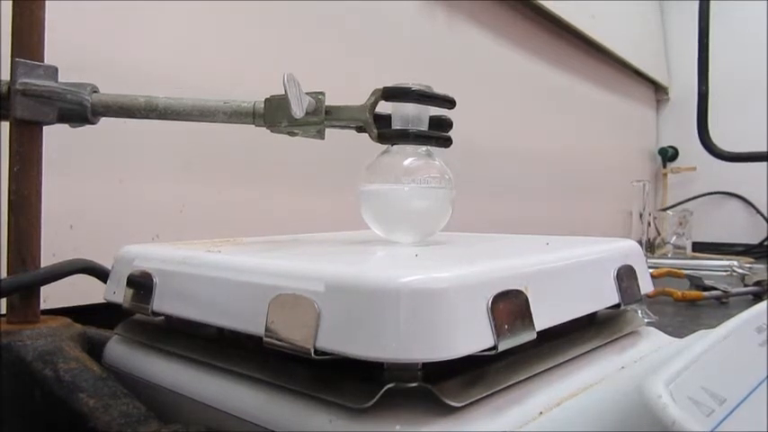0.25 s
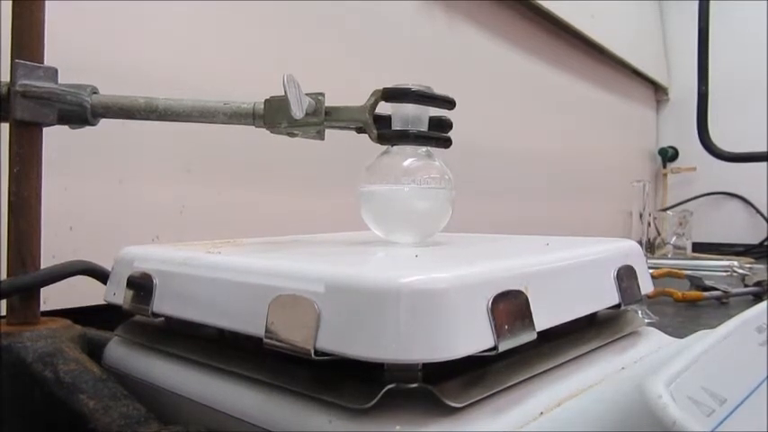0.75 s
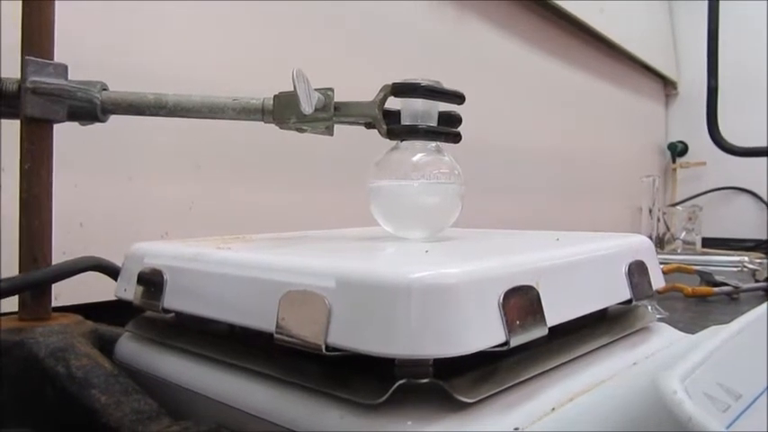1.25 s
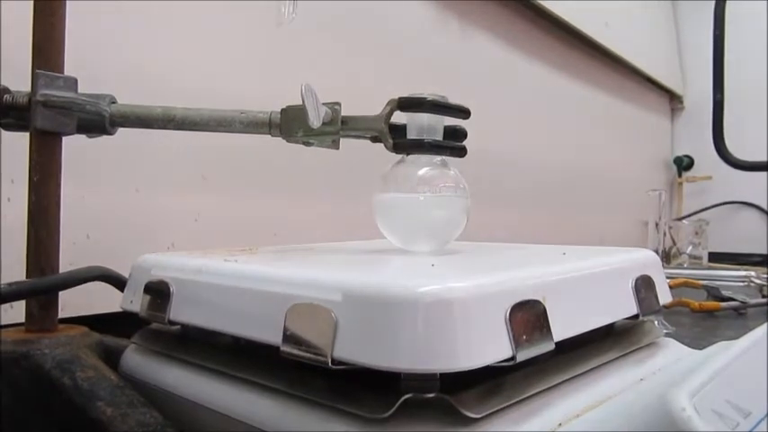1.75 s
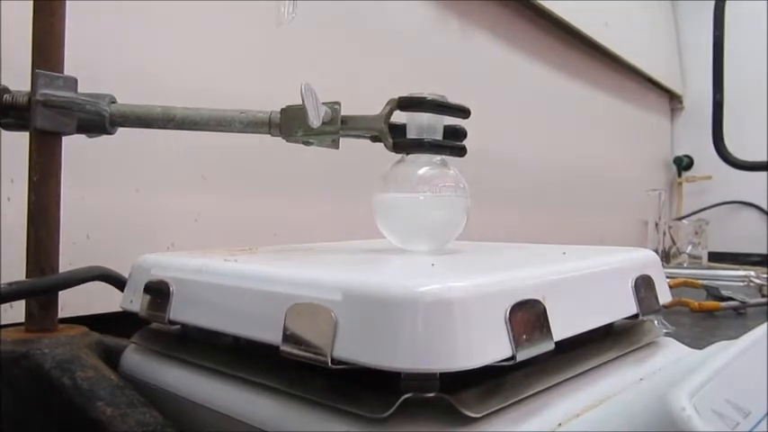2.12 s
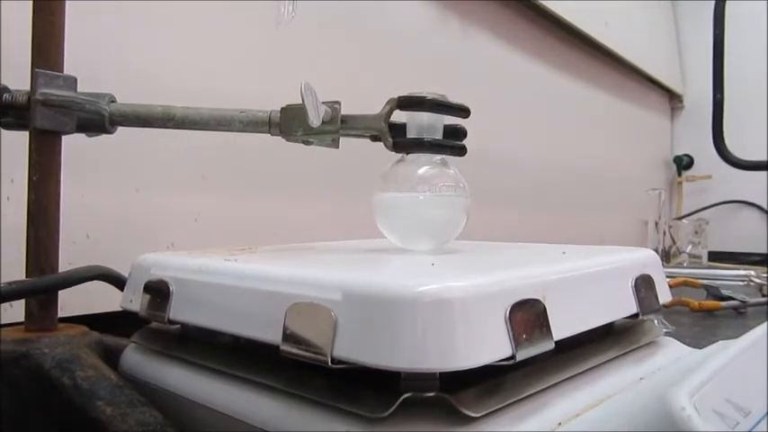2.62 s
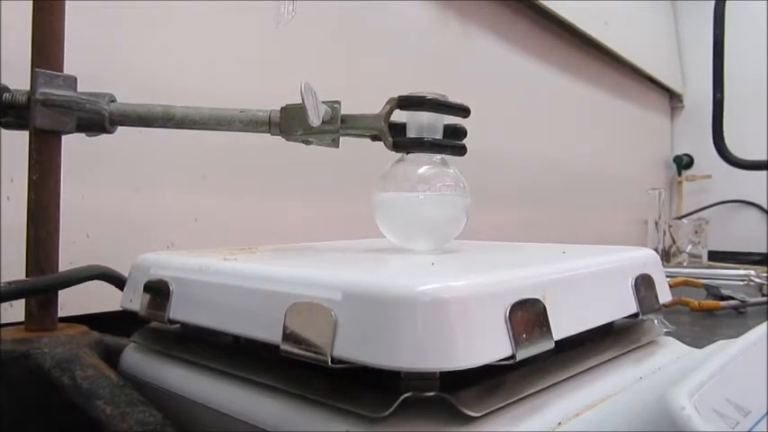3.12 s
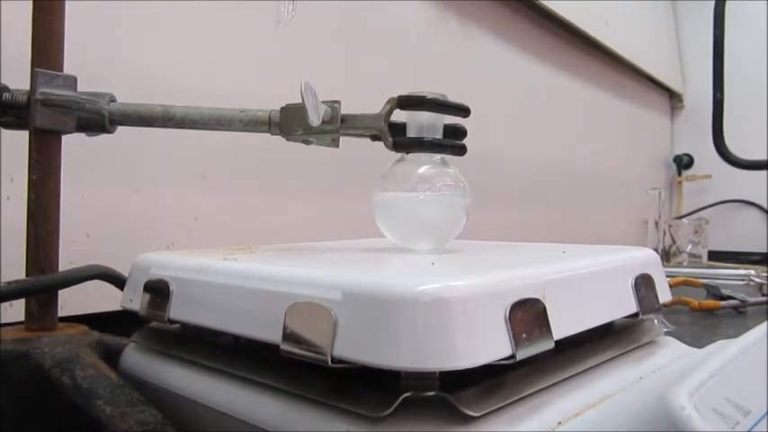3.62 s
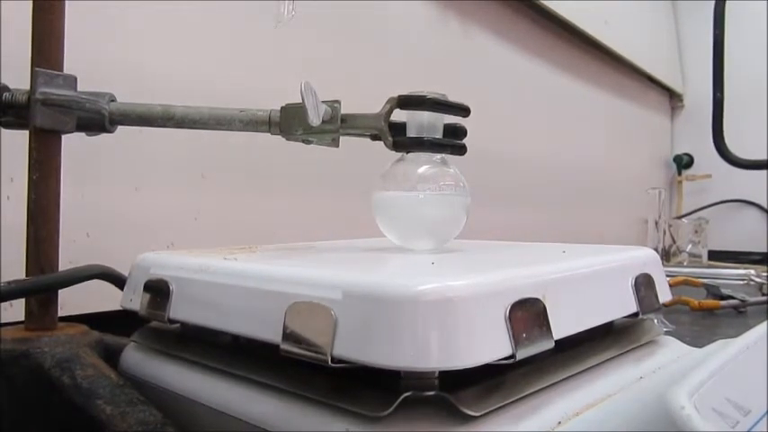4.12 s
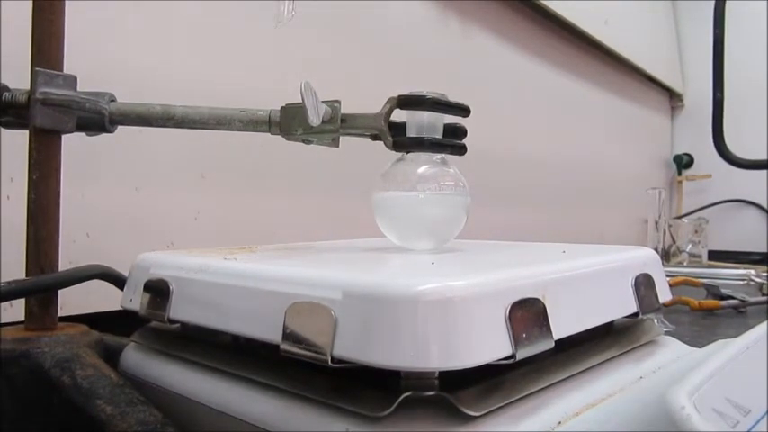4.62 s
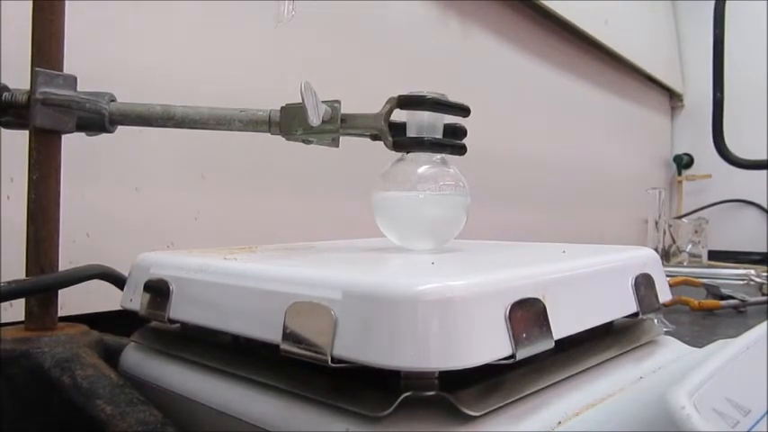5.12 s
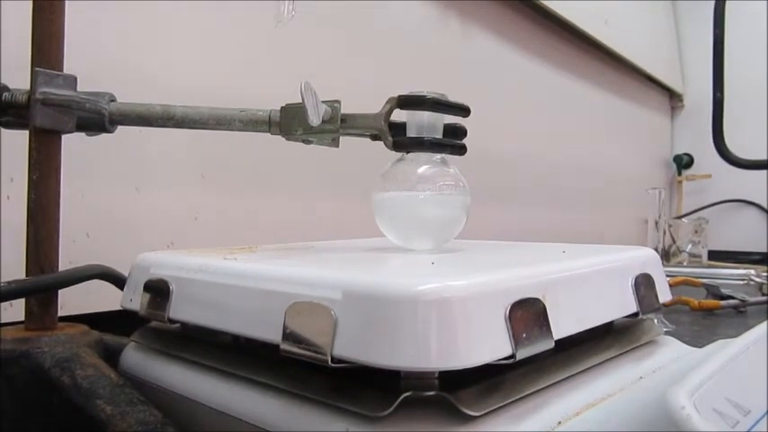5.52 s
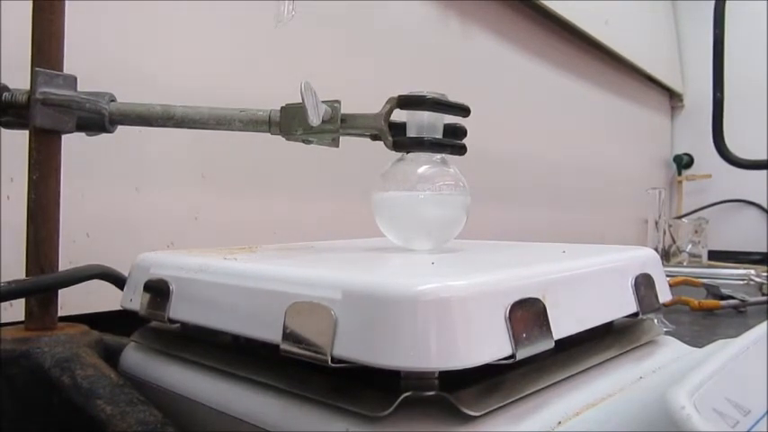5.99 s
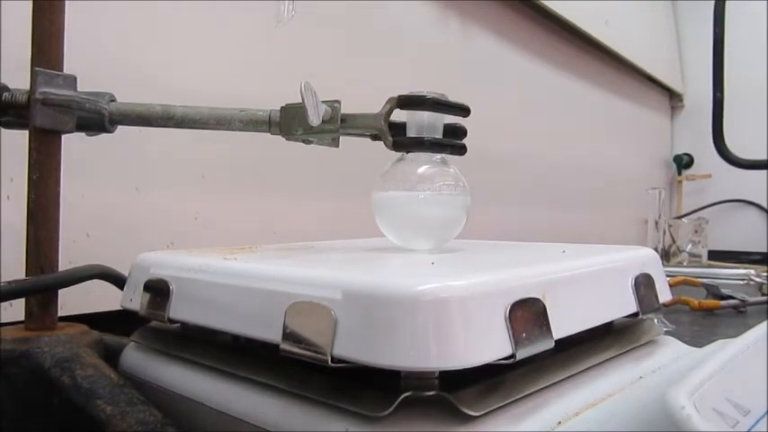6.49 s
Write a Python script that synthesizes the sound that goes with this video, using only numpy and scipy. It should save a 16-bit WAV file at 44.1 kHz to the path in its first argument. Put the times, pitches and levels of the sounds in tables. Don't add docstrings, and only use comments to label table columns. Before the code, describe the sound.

Steady ventilation noise in a chemistry lab, picked up by a small camera microphone. Fan rumble throbs irregularly beneath a coloured midrange rush and softer treble hiss that thins for tiny instants. Early on, a barely noticeable tick precedes a hard cut to silence. The air returns suddenly, a little low, swells back within a fraction of a second and carries on unchanged, ending without a fade.

```python
import sys
import numpy as np
from scipy import signal
from scipy.fft import rfft, irfft, next_fast_len
from scipy.io import wavfile
from scipy.ndimage import uniform_filter1d

SR = 44100
rng = np.random.default_rng(int(sys.argv[2]) if len(sys.argv) > 2 else 0)


def amplitude_ratio(level_db):
    exponent = np.asarray(level_db, float) / 20
    return 10 ** exponent


def bounce(signal):
    frames = np.transpose(np.atleast_2d(signal))
    limited = np.clip(frames, -1, 1)
    pcm = np.round(limited * 32767).astype(np.int16)
    wavfile.write(sys.argv[1], SR, pcm)


N = 297675
t = np.arange(N) / SR


def evened(x):
    return x / np.sqrt(np.mean(x ** 2) + 1e-20)


def bell(hz, centre_hz, width_hz):
    return 1 / (1 + (2 * (hz - centre_hz) / width_hz) ** 2)


def bumps(rows, size_of):
    coarse = np.arange(0, N + 200, 200) / SR
    total = sum(size_of(db) * np.exp(-(2 * (coarse - s) / length) ** 2) for s, db, length in rows)
    return np.interp(t, coarse, total)


# pitch_hz [Hz], level_db [dB per Hz]
AIR_RUSH = [(15, -40), (25, -18), (49, -4.5), (71, -5), (90, -11), (172, -4.5), (207, -12), (326, -12.5),
            (363, -16.5), (573, -11.5), (811, -15), (1580, -15), (2240, -23), (7680, -34), (15000, -58)]
# pitch_hz [Hz], width_hz [Hz], level_db [dB over the rush]
HOOD_RESONANCES = [(106.7, 30, 3), (185.4, 11, 5.5), (228.4, 26, 3.5), (252, 14, 5), (293.5, 8.7, 5.5),
                   (322.7, 18, 4), (343, 16, 6.5), (406.6, 17.5, 8), (448.6, 11, 6.5), (496, 11, -2),
                   (598, 19, 5.5), (647, 28, 3), (716, 44, -2.5), (769, 23, 3), (883.6, 25.5, 5.5),
                   (917, 16, 3), (999, 22, 5.5), (1062, 25, 0.5), (1109.7, 36, 6.5), (1323, 22, 6),
                   (1375, 27, 1), (1520, 32, 3), (1536, 25, 2), (1634, 44, 2), (1770, 30, 4),
                   (1860, 20, 6.5), (1928, 37, 5.5), (2065, 79, 6), (2305, 43, 3.5), (2420, 40, -2.5)]
# pitch_hz [Hz],
# width_hz [Hz], depth_db [dB]
REFLECTION_NULLS = [(46.2, 8, 5), (79.1, 12, 4), (148, 3, 8.5), (206, 17.4, 5), (370, 18, -3.5),
                    (512, 26, 8), (465, 13, 5), (945, 11, -3), (1111, 9.4, 8), (827, 50, 2.5),
                    (1175, 15, 3.5), (1256, 57, 7.5), (1526, 12, 6.5), (1450, 14, 2.5), (1607, 11, 3),
                    (1763, 16, 5), (1830, 35, 4), (1904, 20, 7), (2075, 34, 4.5), (288, 12, 2),
                    (2300, 70, 4)]


def rush(level_db=-28.5, valley_db=-4, patchy_db=0.5, ripple_db=1.5):
    size = next_fast_len(N)
    hz = np.fft.rfftfreq(size, 1 / SR)
    pitch_hz, air_db = np.transpose(AIR_RUSH)
    colour_db = np.interp(np.log(hz + 1), np.log(pitch_hz + 1), air_db)
    colour_db -= sum(depth * bell(hz, centre, width) for centre, width, depth in REFLECTION_NULLS)
    ripple = evened(uniform_filter1d(rng.standard_normal(len(hz)), 150))
    colour_db += ripple_db * np.clip(hz / 2500, 0.3, 1) * ripple
    ringing = sum(amplitude_ratio(2 * db) * bell(hz, centre, width) ** 2 for centre, width, db in HOOD_RESONANCES)
    power = amplitude_ratio(2 * valley_db) + ringing / 2
    air = irfft(rfft(rng.standard_normal(size)) * amplitude_ratio(colour_db) * np.sqrt(power), size)

    cells = signal.stft(air, nperseg=512, noverlap=384)[2]
    patches = uniform_filter1d(rng.standard_normal(cells.shape), 6, 0)
    patches = evened(uniform_filter1d(patches, 24, 1))
    air = signal.istft(cells * amplitude_ratio(patchy_db * patches), nperseg=512, noverlap=384)[1][:N]
    return amplitude_ratio(level_db) * evened(air)


# pitch_hz [Hz], width_hz [Hz], level_db [resting dB]
ROOM_MODES = [(62, 10.5, -35.5), (130.3, 13, -41.5), (167.9, 16, -39.5), (565.3, 9.9, -44.5)]
# start_s [s, at the peak], level_db [added dB], length_s [s]
SURGES_LOWEST = [(0.24, -41, 0.4), (0.65, -34, 0.17), (1.11, -29, 0.069), (1.19, -29.5, 0.46),
                 (1.34, -28, 0.076), (1.878, -30.5, 0.46), (2.402, -33, 0.38), (2.89, -35, 0.34),
                 (3.384, -31.5, 0.11), (3.74, -33, 0.35), (4.17, -33, 0.23), (4.454, -28, 0.13),
                 (4.853, -30.5, 0.15), (5.3, -34.5, 0.4), (5.76, -26, 0.11), (6.08, -33, 0.14),
                 (6.36, -31, 0.06), (6.49, -32.5, 0.45)]
SURGES_SECOND = [(0.1, -28.5, 0.055), (0.36, -29, 0.4), (1.0, -34, 0.4), (1.04, -29, 0.06),
                 (1.21, -36, 0.06), (1.92, -31.5, 0.08), (2.06, -29, 0.044), (2.28, -31, 0.15),
                 (2.57, -34, 0.4), (2.93, -37.3, 0.31), (3.6, -27.5, 0.21), (3.97, -45, 0.4),
                 (4.09, -34.4, 0.06), (4.61, -32, 0.35), (5.37, -34, 0.53), (5.76, -34, 0.26),
                 (6.22, -36, 0.1), (6.64, -32, 0.06)]
SURGES_THIRD = [(0.18, -34, 0.28), (0.73, -38, 0.4), (1.08, -35.5, 0.2), (2.04, -30, 0.08),
                (2.22, -28.5, 0.068), (2.68, -29, 0.33), (2.98, -31, 0.046), (3.43, -41, 0.16),
                (3.75, -31, 0.33), (4.01, -30, 0.067), (4.19, -38, 0.31), (4.63, -35, 0.07),
                (4.75, -29.5, 0.051), (5.07, -33, 0.065), (5.88, -36, 0.3), (6.28, -35, 0.11),
                (6.59, -32, 0.051), (6.62, -34, 0.4)]
SURGES_HIGHEST = [(0.49, -38, 0.44), (1.04, -43, 0.4), (2.28, -41, 0.15), (2.9, -50, 0.36),
                  (3.43, -34, 0.06), (3.82, -40, 0.36), (4.09, -43.4, 0.1), (5.08, -44, 0.33),
                  (5.54, -41, 0.4), (5.95, -41, 0.057), (6.26, -39.5, 0.36), (6.58, -42, 0.2)]
# start_s [s, at the deepest], depth_db [dB], length_s [s]
LOWEST_LULLS = [(.49, -10, .06), (.86, -14, .1), (1.22, -12, .05), (2.13, -8, 0.063), (2.71, -12, .05),
                (3.2, -12, .1), (4.61, -16, .14), (5.6, -10, .08), (5.9, -14, .1), (6.26, -17, .07),
                (6.49, -10, .05)]


def room_modes(steady=0.78):
    out = np.zeros(N)
    all_surges = (SURGES_LOWEST, SURGES_SECOND, SURGES_THIRD, SURGES_HIGHEST)
    for mode, ((hz, width, rest_db), surges) in enumerate(zip(ROOM_MODES, all_surges)):
        decay = np.exp(-np.pi * width / SR)
        slow = rng.standard_normal(N) + 1j * rng.standard_normal(N)
        for _ in range(2):
            slow = signal.lfilter([1], [1, -decay], slow)
        slow /= (abs(slow) + 0.28 * np.median(abs(slow))) ** steady
        level = amplitude_ratio(rest_db) + bumps(surges, amplitude_ratio)
        if mode == 0:
            level *= amplitude_ratio(bumps(LOWEST_LULLS, float))
        tone = (slow * np.exp(2j * np.pi * hz * t)).real
        out += level * evened(tone)
    return out


# start_s [s], pitch_hz [Hz], level_db [dB]
CHANGE_TICK = (1.3515, 5600, -27)


def tick():
    start_s, hz, level_db = CHANGE_TICK
    since = t - start_s
    shape = np.exp(-(since / 0.002) ** 2) + 0.45 * np.exp(-((since - 0.01) / 0.014) ** 2)
    band = signal.butter(3, [hz * 0.7, hz * 1.4], "band", fs=SR, output="sos")
    return amplitude_ratio(level_db) * signal.sosfilt(band, rng.standard_normal(N) * shape)


# start_s [s], end_s [s]
SILENT_GAP = (1.3802, 1.668)


def camera_gain(restart_db=-5, recover_s=0.19):
    since = t - SILENT_GAP[1]
    return amplitude_ratio(restart_db * np.exp(-np.maximum(since, 0) / recover_s) * (since > -0.1))


# pitch_hz [Hz], level_db [dB]
MIC_COLOUR = [(2500, 0), (3200, -1), (3800, 0.5), (5100, 2.5), (5600, -1.5), (7000, -1.5), (8300, 1),
              (9300, -1.5), (12000, 3), (15000, 3.5)]


def microphone(x):
    hz = np.fft.rfftfreq(N, 1 / SR)
    pitch_hz, colour_db = np.transpose(MIC_COLOUR)
    return irfft(rfft(x) * amplitude_ratio(np.interp(np.log(hz + 1), np.log(pitch_hz), colour_db)), N)


# [Hz, above which lines are lost]
THIN_INSTANTS = [(.082, 4000), (.509, 3500), (.594, 3520), (.871, 3050), (2.301, 2780), (2.386, 3500),
                 (2.599, 2500), (2.748, 4060), (3.602, 2820), (3.730, 2800), (3.792, 3020), (3.858, 3000),
                 (4.882, 5500), (6.377, 2500)]


def thin_treble(x):
    out, size = x.copy(), round(2048 / 48000 * SR)
    hz = np.fft.rfftfreq(size, 1 / SR)
    window = np.pi * ((np.arange(size) + 0.5) / size - 0.5)
    cusp = np.maximum(1 - np.sqrt(np.sin(window) ** 2 + 0.008), 0) / np.cos(window)
    needed, thinning_hz, lift_db = 2.1, 12000, 4.0
    for middle_s, from_hz in THIN_INSTANTS:
        at = round(middle_s * SR) - size // 2
        lines = rfft(x[at:at + size] * np.cos(window))
        power = abs(lines) ** 2
        strength = uniform_filter1d(power, size=2) / uniform_filter1d(power + 1e-20, size=41)
        kept = (strength > needed + (hz - from_hz) / thinning_hz) & (hz < 9000)
        gain = np.where(hz < from_hz, 1, kept * amplitude_ratio(lift_db))
        out[at:at + size] += cusp * irfft(lines * (gain - 1), size)
    return out


# [Hz, above which all is lost]
LOST_TREBLE = [
    (1.361, 1.3645, 7800),
    (1.674, 1.68, 5600),
]
# start_s [s, at the middle], pitch_hz [Hz], level_db [dB]
LONE_LINE = (1.679, 8000, -52)


def empty_treble(x):
    middle_s, hz, level_db = LONE_LINE
    swell = np.cos(np.pi / 2 * np.clip((t - middle_s) / 0.016, -1, 1))
    out = x + amplitude_ratio(level_db) * np.sin(2 * np.pi * hz * t) * swell
    for start, end, from_hz in LOST_TREBLE:
        highpass = signal.firwin(255, from_hz, pass_zero=False, fs=SR)
        treble = signal.oaconvolve(x, highpass, "same")
        early_s, late_s = (0.007, 0.001) if end < SILENT_GAP[0] else (0.002, 0.014)
        loss = np.interp(t, [start - early_s, start, end, end + late_s], [0, 1, 1, 0])
        out -= treble * np.sin(np.pi / 2 * loss)
    return out


def scene():
    hood = amplitude_ratio(4.0) * rush() + room_modes()
    return (hood * camera_gain() + tick())[None]


def top_cut(x):
    return signal.sosfilt(signal.butter(12, 15660, fs=SR, output="sos"), x)


def record(dry):
    heard = empty_treble(thin_treble(microphone(dry[0])))
    opened = np.maximum(1.5 - t, t - SILENT_GAP[1] + 0.00054) / 0.0016
    started = heard * np.clip(opened, 0, 1)
    lowpass = signal.firwin(2047, 14990, window=("kaiser", 9), fs=SR)
    limited = signal.oaconvolve(started, lowpass, "same")
    mix = limited * ((t < SILENT_GAP[0]) | (t > 1.6))
    return top_cut(mix[None])


dry = scene()
out = record(dry)
bounce(out)
```